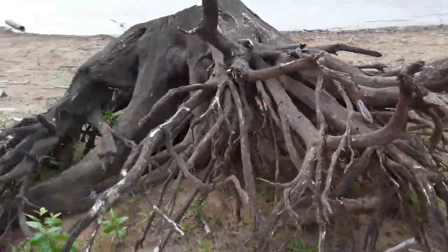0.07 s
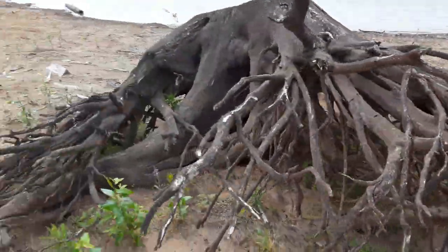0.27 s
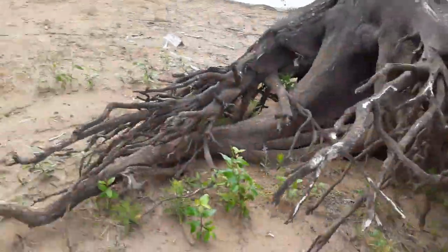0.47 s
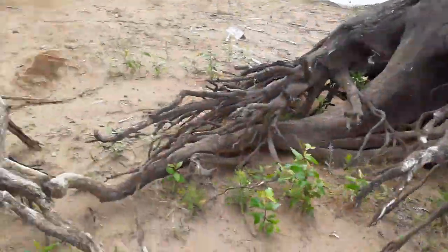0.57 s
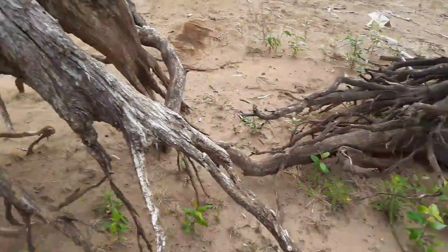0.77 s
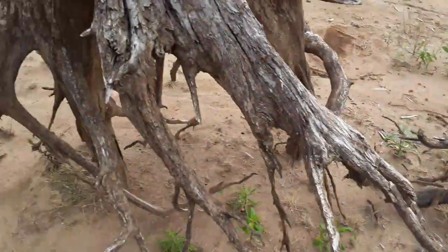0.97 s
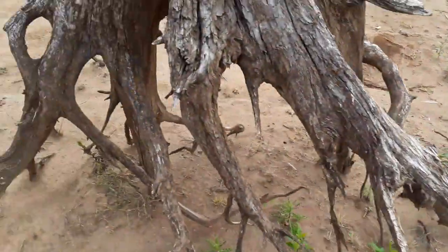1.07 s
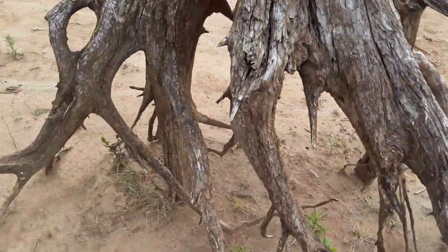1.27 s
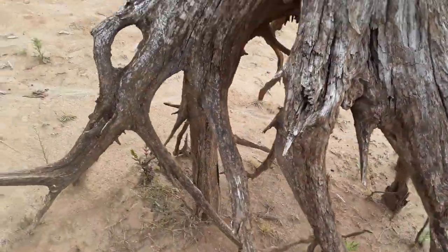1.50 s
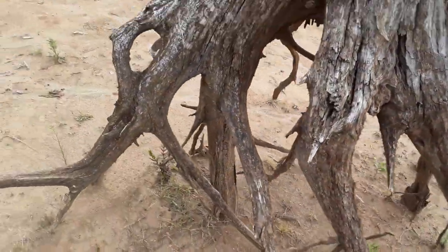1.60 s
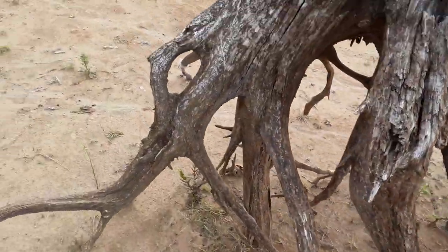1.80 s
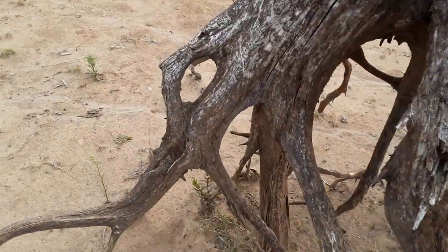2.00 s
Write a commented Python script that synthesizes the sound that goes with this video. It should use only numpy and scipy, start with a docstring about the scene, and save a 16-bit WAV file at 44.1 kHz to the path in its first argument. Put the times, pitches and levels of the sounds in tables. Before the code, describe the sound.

Gusts of wind rumble and bump against a hand-held microphone on open sandy ground. Someone takes three slow, quietly crunching steps, and as the wind eases a little, scattering sand and tiny snaps come through.

```python
"""Three steps on a breezy shore

Gusts and eddies buffet the two ports of a hand-held microphone, each port separately.
Three slow steps pack the sand in short, resonant crunches made of dense clicks. Loose grains
spray and rustle around them, litter snaps, the shoe scrapes once, and a faint hiss lies under it all."""
import sys
import numpy as np
from scipy import signal
from scipy.fft import rfft, irfft
from scipy.io import wavfile

SR = 44100
rng = np.random.default_rng(int(sys.argv[2]) if len(sys.argv) > 2 else 0)


def wrap_up_sound(samples):
    """Save the sound to the file named by the first command line argument, as 16-bit audio."""
    columns = np.atleast_2d(samples).T
    # keep every value between -1 and 1, then stretch to whole-number steps
    tamed = np.clip(columns, -1, 1)
    steps = np.round(tamed * 32767).astype(np.int16)
    wavfile.write(sys.argv[1], SR, steps)


N = 90404
T, HZ = np.arange(N) / SR, np.fft.rfftfreq(N, 1 / SR)
PORT_DELAY_S = 0.000215


def amp(db):
    """Decibels to gain."""
    return 10 ** (np.asarray(db) / 20)


def unit(x):
    """Scales each channel to rms 1."""
    return x / np.sqrt(np.mean(x ** 2, -1, keepdims=True) + 1e-20)


def eq_curve(points, hz=HZ):
    """An EQ in dB: points joined by straight lines over log frequency."""
    freq_hz, gain_db = np.transpose(points)
    return np.interp(np.log(hz + 1), np.log(freq_hz), gain_db)


def colour(x, eq_db):
    """Applies an EQ, then scales to rms 1."""
    return unit(irfft(rfft(x) * amp(eq_db), N))


def resonance(pitch_hz, width_hz):
    """Gain curve of one resonant peak."""
    return 1 / (1 + (2 * (HZ - pitch_hz) / width_hz) ** 2)


def noise():
    """Unrelated white noise at the two ports."""
    return rng.standard_normal((2, N))


def swell(peak_s, rise_s, decay_s):
    """A rounded attack up to the peak, then an exponential tail."""
    return np.exp(-.5 * (np.minimum(T - peak_s, 0) / rise_s) ** 2 - np.maximum(T - peak_s, 0) / decay_s)


def grains(eq_db, per_s=4000, spread_db=2.5, shared=0.55, delay_s=0):
    """Dense clicks of uneven size; those shared by both ports reach the right one delay_s later."""
    clicks = rng.choice([-1., 1.], (3, N)) * (rng.random((3, N)) < per_s / SR)
    sizes = amp(spread_db * np.minimum(rng.exponential(1, (3, N)), 4))
    direct, left, right = unit(clicks * sizes)
    late = irfft(rfft(direct) * np.exp(-2j * np.pi * HZ * delay_s), N)
    stereo = np.sqrt(shared) * np.array([direct, late]) + np.sqrt(1 - shared) * np.array([left, right])
    return colour(stereo, eq_db)


def pan(right_db):
    """Channel gains that put the right side right_db above the left."""
    return amp([[-right_db / 2], [right_db / 2]])


# Fader ride of the airflow between eddies: time_s, left_db, right_db
BREEZE_RIDE = [(0, -38, -47), (0.035, -64, -57), (0.1, -46, -61), (0.18, -52, -61), (0.25, -41, -39),
               (0.3, -41.5, -37), (0.39, -36.5, -35.5), (0.5, -33, -24), (0.59, -35, -31.5),
               (0.67, -40.5, -35), (0.84, -36.5, -32), (0.93, -32, -29), (1.08, -34, -26.5),
               (1.21, -47, -38.5), (1.4, -47.5, -40.5), (1.55, -50, -43.5), (1.74, -36.5, -36),
               (1.86, -56, -43.5), (2.05, -46, -39.5)]
# Boomy tone of air buffeting a port: freq_hz, gain_db
BUFFET_EQ = [(25, -26), (50, -32), (90, -12), (140, -1.5), (200, 1), (270, 2), (350, -4), (480, -12.5),
             (700, -26), (1000, -38.5), (1600, -54.5), (2400, -69), (4000, -79), (8000, -89)]
# Deep bed under the wind: freq_hz, gain_db
RUMBLE_EQ = [(15, -5), (40, -11.5), (85, 5.5), (130, 7), (250, -58), (600, -92)]


def breeze():
    """Churning airflow that brightens with strength, over a deep rumble that partly follows it."""
    churn_depth_db, churn_hz, bright_from_db = 3.5, 45, -38
    time_s, *ports = np.transpose(BREEZE_RIDE)
    flow_db = np.array([np.interp(T, time_s, port) for port in ports])
    churn = colour(noise(), -10 * np.log10(1 + (HZ / churn_hz) ** 8))
    gust_db = flow_db + churn_depth_db * churn
    air = colour(noise(), eq_curve(BUFFET_EQ))
    shelf = np.clip(np.log(HZ / 380 + 1e-9) / np.log(2.6), 0, 1)  # opens from 380 Hz to about 1 kHz
    top = irfft(rfft(air) * shelf, N)
    brightness = amp(0.82 * np.minimum(gust_db - bright_from_db, 6))
    buffet = (air - top + top * brightness) * amp(gust_db - 3.5)
    rumble = colour(noise(), eq_curve(RUMBLE_EQ)) * amp(-51 + 0.42 * (flow_db + 40))
    return buffet + rumble


# Thin, airy noise bed: freq_hz, gain_db
HISS_EQ = [(1500, 6), (3000, -3), (6700, -2.5), (7800, -22.5), (10000, -1.5), (12400, 10), (15500, -0.5)]


def hiss():
    """A faint, steady hiss, leaning right."""
    return colour(noise(), eq_curve(HISS_EQ)) * amp(-64.5) * pan(right_db=3.5)


# Fader ride of the walking rustle: time_s, level_db
RUSTLE_RIDE = [(0, -76.5), (.17, -62.5), (.3, -67.5), (.42, -64), (.5, -62), (.62, -62.5), (1.03, -63),
               (1.1, -49.5), (1.2, -53), (1.29, -52), (1.37, -61), (1.5, -56.5), (1.56, -60.5),
               (1.63, -54.5), (1.7, -49), (1.82, -48.5), (1.88, -55), (1.98, -53.5), (2.05, -58.5)]
# Soft, low-heavy tone of the rustle: freq_hz, gain_db
RUSTLE_EQ = [(200, 14), (800, 2), (1500, -13), (3000, -8.5), (6500, -8.5), (8000, -16.5), (10000, -14),
             (12500, -7), (15500, -13.5)]


def rustle():
    """Sand and clothing shift softly and continuously."""
    texture = grains(eq_curve(RUSTLE_EQ), per_s=9000, spread_db=3.2, shared=0.14, delay_s=PORT_DELAY_S)
    return texture * amp(np.interp(T, *np.transpose(RUSTLE_RIDE)))


# Wind bumps at the ports, plus a low damped thud just after the second step (the rows at 1.15 and 1.172 s):
# peak_s, left_db, right_db, pitch_hz
EDDY_HITS = [(0.065, -43.5, -50, 183), (0.219, -26.5, -32, 240), (0.293, -20.5, -28.5, 256),
             (0.329, -25, -37, 246), (0.352, -28.5, -32, 227), (0.386, -34.5, -52, 266),
             (0.422, -37.5, -24.5, 280), (0.469, -26.5, -26, 337), (0.498, -28, -23.5, 228),
             (0.52, -26.5, -36.5, 245), (0.56, -26, -20.5, 230), (0.607, -33.5, -28.5, 277),
             (0.636, -35, -28, 270), (0.702, -43, -27, 268), (0.766, -28, -24.5, 264),
             (0.802, -29, -24.5, 237), (0.864, -43, -25, 308), (0.902, -37, -18.5, 261),
             (0.922, -23.5, -22.5, 280), (0.945, -34.5, -23.5, 256), (0.968, -31.5, -24.5, 243),
             (1.009, -25.5, -27, 257), (1.04, -28.5, -21.5, 245), (1.105, -35, -24.5, 260),
             (1.127, -29, -29.5, 228), (1.15, -33, -36, 140), (1.172, -37, -39.5, 149),
             (1.256, -37, -29, 225), (1.342, -35.5, -35.5, 190), (1.363, -38, -31.5, 233),
             (1.379, -36.5, -31.5, 168), (1.408, -55, -33.5, 193), (1.432, -32, -33, 180),
             (1.505, -35.5, -34, 252), (1.614, -33.5, -32.5, 209), (1.687, -33.5, -30, 200),
             (1.727, -51, -27, 224), (1.742, -33, -26.5, 200), (1.759, -45.5, -20, 243),
             (1.812, -35.5, -35.5, 190)]


def eddies():
    """Each eddy is a puff of a few low cycles, different at each port."""
    size, width_s, buffet_pitch_hz = 4096, 0.008, 241.5
    t, hz = (np.arange(size) - size // 2) / SR, np.fft.rfftfreq(size, 1 / SR)
    window = np.exp(-.5 * (t / width_s) ** 2)
    out = np.zeros((2, N + 2 * size))
    for peak_s, left_db, right_db, pitch_hz in EDDY_HITS:
        tuned_eq_db = eq_curve(BUFFET_EQ, hz * buffet_pitch_hz / pitch_hz)
        air = irfft(rfft(rng.standard_normal((2, size))) * amp(tuned_eq_db))
        puff = unit(air * window) * np.sqrt(np.mean(window ** 2))
        start = round(peak_s * SR) + size // 2
        out[:, start:start + size] += puff * amp([[left_db], [right_db]])
    return amp(-2) * out[:, size:size + N]


# Kicks of loose sand: peak_s, rise_s, decay_s, level_db, coarse_offset_db
SPRAY_HITS = [(.2, 0.0076, .008, -63.5, 3), (.355, .004, 0.01, -59.5, -17), (0.463, 0.01, 0.07, -62, 7),
              (.85, 0.015, .015, -62, -1), (1.085, 0.029, 0.019, -58.5, -13),
              (1.117, 0.0098, 0.01, -43.5, -21), (1.141, 0.0079, 0.0095, -43.5, 3),
              (1.163, 0.0059, .016, -42, 4.5), (1.228, 0.016, 0.019, -54, -5),
              (1.424, 0.0037, 0.019, -47, -7), (1.459, 0.0051, 0.0093, -47, -13),
              (1.501, 0.0051, 0.0086, -42, -8), (1.525, 0.0056, 0.029, -57.5, 3),
              (1.611, 0.024, 0.032, -47.5, 3), (1.642, 0.011, 0.017, -51, -0.5),
              (1.667, 0.0064, 0.011, -55, -6), (1.716, 0.0092, 0.016, -54.5, 7),
              (1.775, 0.022, 0.027, -49.5, 4.5), (1.966, 0.0034, 0.006, -51.5, -19),
              (1.98, 0.0037, 0.0062, -56, 4)]
# Fizzy top of the fine grains: freq_hz, gain_db
FINE_EQ = [(1000, -56), (4000, -28), (6700, -0.5), (7900, -27.5), (9200, -4), (10700, 0.5), (12800, 8.5),
           (15500, 0.5)]
# Gritty mids of the coarse grains: freq_hz, gain_db
COARSE_EQ = [(400, -25), (1500, -11), (3200, 6), (4500, 5.5), (6500, 4.5), (8000, -2), (12000, -27)]


def sprays():
    """Kicked sand: a fine fizz with a varying share of coarser grains."""
    fine_env, coarse_env, coarse_trim_db = 0, 0, -10.5
    for peak_s, rise_s, decay_s, level_db, coarse_offset_db in SPRAY_HITS:
        burst = amp(level_db) * swell(peak_s, rise_s, decay_s)
        fine_env += burst
        coarse_env += burst * amp(coarse_offset_db + coarse_trim_db)
    fine, coarse = (grains(eq_curve(eq), per_s=4500, spread_db=4, shared=0.25, delay_s=PORT_DELAY_S)
                    for eq in (FINE_EQ, COARSE_EQ))
    return fine * fine_env + coarse * coarse_env


# Sharp flicks of wind across a port: peak_s, left_db, right_db
FLICK_HITS = [(0.3, -40.5, -51), (0.328, -33.5, -55), (.365, -44, -62), (0.385, -34, -61), (.497, -53, -40),
              (0.567, -60, -34.5), (0.606, -60, -37.5), (0.654, -65, -40), (0.721, -68, -42.5),
              (.802, -71, -38.5), (.866, -60, -38), (0.898, -60, -40.5), (0.963, -62, -38.5)]
# Dull pop of a flick: freq_hz, gain_db
FLICK_EQ = [(80, -13), (300, 2.5), (600, 0.5), (1000, -8.5), (2000, -23.5), (3000, -38), (5000, -46),
            (10000, -70)]


def flicks():
    """The sharpest eddies pop against a port for a few milliseconds."""
    envelope = sum(amp([[left_db], [right_db]]) * swell(peak_s, rise_s=0.0015, decay_s=0.0035)
                   for peak_s, left_db, right_db in FLICK_HITS)
    return colour(noise(), eq_curve(FLICK_EQ)) * envelope


# Footfalls: peak_s, rise_s, decay_s, level_db, knock_hz, knock_db, tilt_db_per_octave, high_cut_hz
STEP_HITS = [(0.459, 0.0053, 0.017, -38, 800, 11.5, -5.5, 1750),
             (1.116, 0.0079, 0.013, -33.5, 1770, 4.5, -4, 5870),
             (1.768, 0.014, 0.028, -42, 1156, 10.5, 0.5, 4300)]
# Resonances of the crunch under the sole: pitch_hz, width_hz, gain_db
CRUNCH_PEAKS = [(709, 68, -0.5), (907, 71, -4), (1410, 36, -13), (1870, 78, -9), (2230, 160, -11),
                (2750, 48, 2.5), (5040, 73, 4), (6000, 40, 12)]


def steps():
    """Sand packs under the sole in a short resonant crunch, then settles."""
    low_cut_hz, settle_db, settle_s = 398, -17, 0.072
    ring = sum(amp(db + 1.5) * resonance(pitch_hz, width_hz) for pitch_hz, width_hz, db in CRUNCH_PEAKS)
    out = np.zeros((2, N))
    for peak_s, rise_s, decay_s, level_db, knock_hz, knock_db, tilt, high_cut_hz in STEP_HITS:
        knock = 1 + (amp(knock_db) - 1) * resonance(knock_hz, width_hz=150)
        band = (HZ + 1) / np.hypot(HZ, low_cut_hz) / np.sqrt(1 + (HZ / high_cut_hz) ** 10)
        tilt_db = tilt * np.log2(np.maximum(HZ / 900, 1))  # acts above 900 Hz
        crunch = grains(20 * np.log10((1 + ring) * knock * band) + tilt_db, delay_s=0.0001)
        envelope = swell(peak_s, rise_s, decay_s) + amp(settle_db) * swell(peak_s, rise_s, settle_s)
        out += crunch * amp(level_db) * envelope
    return out


# Small snaps underfoot: peak_s, level_db
SNAP_HITS = [(1.2644, -43), (1.602, -58), (1.7062, -48.5), (1.709, -47.5)]
# Brittle tone of a snap: freq_hz, gain_db
SNAP_EQ = [(600, -4), (1800, 5), (4500, -3), (6500, -3), (8000, -19), (12500, 2.5), (15500, -2)]


def snaps():
    """Dry bits of litter break underfoot."""
    envelope = sum(amp(db) * swell(peak_s, rise_s=0.00059, decay_s=0.0027) for peak_s, db in SNAP_HITS)
    return colour(noise(), eq_curve(SNAP_EQ)) * envelope


# Narrow rasp of the shoe, near 3 kHz: freq_hz, gain_db
SCRAPE_EQ = [(2000, -40), (2600, -21), (2930, 5), (3300, -9), (4300, -9), (4900, -31), (9000, -38)]


def scrape():
    """The shoe grates briefly before the last step."""
    return grains(eq_curve(SCRAPE_EQ)) * amp(-48) * swell(peak_s=1.611, rise_s=0.0048, decay_s=0.0093)


def scene():
    """The stereo mix: wind up front, footwork a little to the right, hiss underneath."""
    wind = breeze() + eddies() + flicks()
    shoes = (steps() + scrape()) * pan(right_db=2)
    loose_ground = (rustle() + sprays() + snaps()) * pan(right_db=0.8)
    return wind + shoes + loose_ground + hiss()


def record(dry):
    """A steep high cut on the whole mix."""
    high_cut_hz = 15740
    taps = signal.firwin(511, high_cut_hz, window=("kaiser", 9), fs=SR)
    return signal.oaconvolve(dry, taps[None], "same")


dry = scene()
out = record(dry)
wrap_up_sound(out)
```